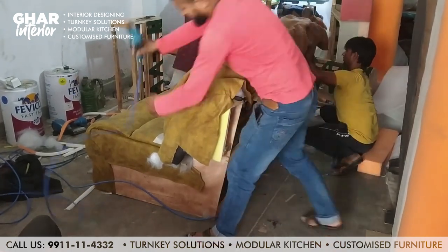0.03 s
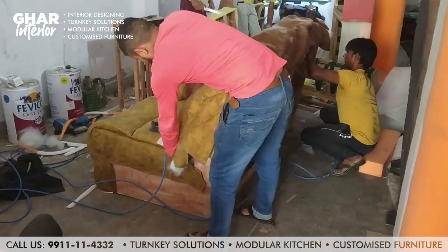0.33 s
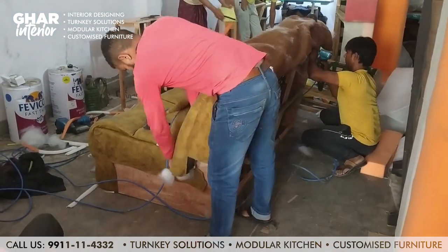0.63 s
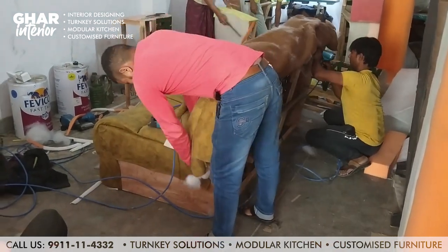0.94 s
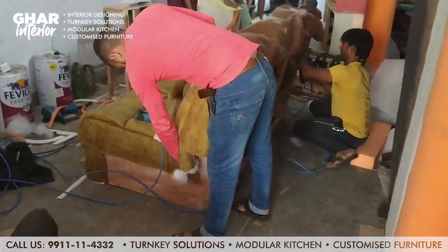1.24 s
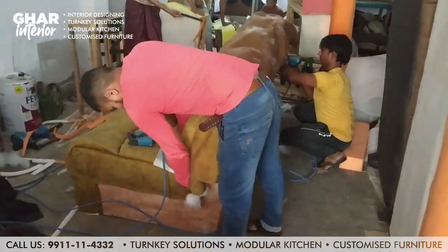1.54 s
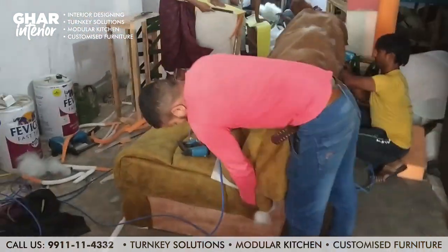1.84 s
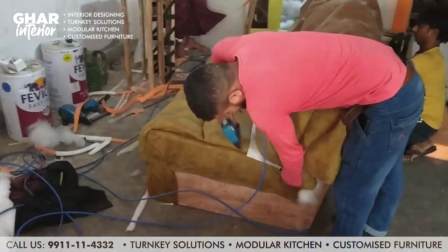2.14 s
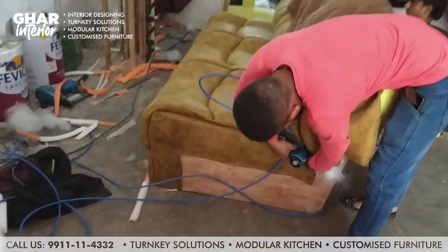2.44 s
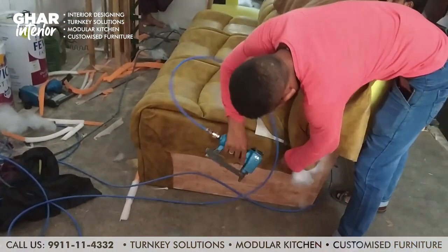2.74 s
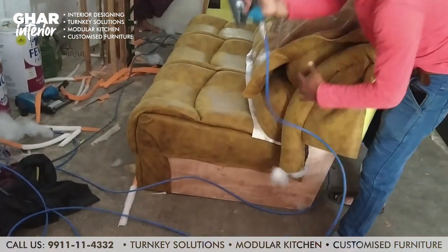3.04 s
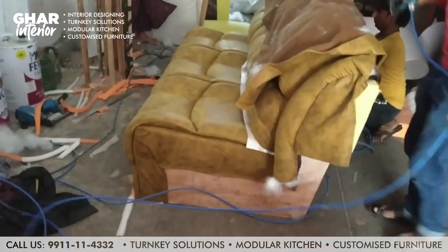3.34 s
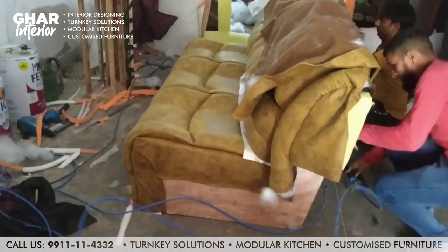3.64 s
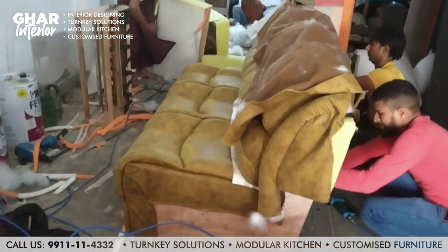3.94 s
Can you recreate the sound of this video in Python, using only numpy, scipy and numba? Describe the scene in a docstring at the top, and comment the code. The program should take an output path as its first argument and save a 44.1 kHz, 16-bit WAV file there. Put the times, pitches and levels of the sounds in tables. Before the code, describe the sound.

An air compressor runs with a rapid clatter and whistling hiss, heard from a moving microphone in an upholstery workshop. A pneumatic stapler cracks and puffs three times, twice, once loudly, then twice more, with a few faint squeaks.

```python
"""An air compressor drones in a small upholstery workshop: its pump thumps and clatters each turn,
and air hisses and whistles through its resonant passages. The tone shifts as the microphone moves.
A pneumatic stapler fires eight times, each a crack and, on release of the trigger, a very shrill puff
of exhaust; once the trigger clicks as it is released. A few faint squeaks come from the room, and one
light tick is heard. The microphone's limiter ducks the drone at the loud cracks and puffs."""
import sys
import numpy as np
from scipy import signal
from scipy.fft import rfft, irfft
from scipy.io import wavfile
from scipy.ndimage import uniform_filter1d
from numba import njit

SR = 44100
rng = np.random.default_rng(int(sys.argv[2]) if len(sys.argv) > 2 else 0)


def pcm_store(signal):
    """Save signal as 16-bit PCM."""
    levels = np.round(np.clip(np.atleast_2d(signal), -1, 1) * 32767)
    wavfile.write(sys.argv[1], SR, levels.astype(np.int16).T)


N = 176400

PUMP_HZ = 27.32  # turns per second
RIPPLE_DB, RIPPLE_HZ = 2.3, 90  # spectral ripple from reflections: depth, spacing

# the compressor at each place of the moving microphone
# (t/s, clatter gain/dB, air gain/dB, midrange tilt/(dB per octave), cover resonance/dB)
PLACES = [(0, -3.5, 0, -1.5, -7), (.7, -2, 0.4, -2, 2), (1.2, -4, -1, -1.9, -4), (1.7, 2.5, 0.5, -1.5, -2),
          (2.3, 2.5, 1, 0.1, 0), (3.0, 1.5, 1, 0.5, 4.5), (4, 3, 1.5, -0.5, 2.5)]
# balance of the two microphone ports (f/Hz, left minus right/dB)
PORT_BALANCE = [(60, 0), (200, -1.5), (700, 0), (1290, -2.5), (2380, -0.5), (4400, 3), (8120, 0),
                (15000, -3)]


def pump_clatter(t, turns):
    """Periodic excitation: clatter repeats each turn, its harmonics shaped by the path through the room."""
    # envelope of the harmonics (f/Hz, relative level/dB)
    clatter_tone = [(160, -106), (260, -76.5), (410, -74), (480, -74), (525, -50.5), (595, -63.5),
                    (630, -43.5), (680, -66), (711, -76), (740, -65), (790, -49), (830, -64.5),
                    (880, -48.5), (1010, -49.5), (1130, -74), (1340, -48.5), (1440, -56), (1540, -58.5),
                    (1670, -45), (1780, -49.5), (1880, -70), (3000, -78.5)]
    clatter_level_db, place_variation = -25.5, 0.214
    cover_hz, cover_width_hz = 960, 90
    common, out = turn_harmonics(), 0
    for k, (_, clatter_db, _, slope_db, cover_db) in enumerate(PLACES):
        lines = common + place_variation * turn_harmonics()
        hz = np.arange(lines.shape[1]) * PUMP_HZ
        pair = ports(*(lines / abs(lines)), hz)
        lean = undb(np.array([[1], [-1]]) * at_hz(PORT_BALANCE, hz) / 2)
        cover = cover_db * np.exp(-((hz - cover_hz) / cover_width_hz) ** 2)
        tone = undb(at_hz(clatter_tone, hz) + cover) * tilt(hz, slope_db) / (1 + (hz / 6000) ** 2)
        cycle = unit(irfft(pair / abs(pair) * lean * tone))
        phase = np.arange(cycle.shape[1]) / cycle.shape[1]
        repeated = np.array([np.interp(turns % 1, phase, side) for side in cycle])
        out = out + undb(clatter_db) * presence(t, k) * repeated
    return out * undb(clatter_level_db)


def turn_harmonics(size=2048, rattle_db=-18.5):
    """Fourier series of one turn: noisy knocks over a light rattle."""
    envelope = knocking(np.arange(size) / size) + undb(rattle_db)
    return rfft(envelope * rng.standard_normal((2, size)))


def knocking(turns, swell_s=0.00243):
    """Envelope of repeated impacts: each swells, then decays exponentially."""
    # knocks within one turn (phase/turn, relative level/dB)
    knocks = [(0.092, 2.5), (.31, -3), (.6, -8.5), (0.852, 0.5)]
    ages = [((turns - start) % 1) / PUMP_HZ / swell_s for start, _ in knocks]
    return sum(undb(db) * age * np.exp(1 - age) for age, (_, db) in zip(ages, knocks))


def piston(t, turns):
    """Impact excitation: two thumps a turn sound the pump's body; knocks keep the housing ringing."""
    # thumps as the microphone moves (t/s, phase of first/turn, body f/Hz, first level/dB, second level/dB)
    thumps = [(0, .25, 770, -18, -23), (1, .25, 765, -18, -23), (1.35, .235, 750, -14.5, -23),
              (1.75, .21, 730, -15.5, -24), (2.25, .14, 695, -19, -15), (2.8, .13, 685, -17.5, -15.5),
              (4, .13, 700, -17.5, -15.5)]
    # ring of the metal housing (t/s, level/dB)
    ring_levels = [(0, -25), (1.1, -24), (1.6, -22), (2.3, -26.5), (2.8, -20), (3.3, -19), (3.7, -30)]
    thump_s, gap_turns, left_lag_s = .0034, .252, .00013
    ring_harmonic = round(1700 / PUMP_HZ)
    turns = turns - np.array([[left_lag_s * PUMP_HZ], [0]])
    phase, body_hz, first_db, second_db = curve(t, thumps)
    out = undb(curve(t, ring_levels)[0]) * knocking(turns) * np.cos(2 * np.pi * ring_harmonic * turns)
    for centre, db in ((phase, first_db), (phase + gap_turns, second_db)):
        age = ((turns - centre + .5) % 1 - .5) / PUMP_HZ
        out = out + undb(db) * np.exp(-(age / thump_s) ** 2) * np.cos(2 * np.pi * body_hz * age)
    return out


def airflow(t, turns):
    """Flow noise: air rushes through resonant passages and spits from the valve once a turn."""
    # rushing air (f/Hz, relative level/dB)
    rush_tone = [(25, -108), (110, -101), (240, -85), (390, -69.5), (450, -62), (800, -54.5), (1000, -54),
                 (1120, -59), (1300, -54.5), (1750, -54.5), (2300, -60), (2950, -55.5), (3370, -50),
                 (3580, -53.5), (3800, -52), (4300, -60), (5130, -50), (5550, -58.5), (6050, -56),
                 (7300, -68.5), (9800, -61.5), (12300, -70), (13200, -65), (15700, -73)]
    # passage resonances (f/Hz, half width/Hz, throb with the knocks 0-1, rows of (t/s, level/dB))
    resonances = [(3377, 44, 0.64, [(0, -31.5), (1.5, -32.5), (2.3, -34), (2.85, -27.5), (3.3, -30),
                  (3.6, -37)]), (5130, 9.6, 0, [(0, -30), (1.2, -30), (1.5, -29), (2.4, -29.5),
                  (2.9, -30.5), (4, -25.5)]), (5160, 230, 0, [(0, -48), (1.1, -33), (1.5, -35),
                  (2.3, -25.5), (2.9, -51), (4, -41)]), (12020, 330, 0, [(0, -33), (.7, -30), (1.5, -36),
                  (2.4, -38), (2.9, -32.5), (4, -32)])]
    # valve spit (f/Hz, relative level/dB)
    spit_tone = [(5000, -50), (8000, -1), (9800, -2), (12500, -1), (15500, -8)]
    rush_db, spit_db, flicker_db = -18.5, -28, 1
    stroke_depth, stroke_peak_turn, spit_turn = 0.027, 0.098, .12
    rush = ringing = 0
    for k, (_, _, air_db, slope_db, _) in enumerate(PLACES):
        rush += undb(rush_db + air_db) * np.sqrt(presence(t, k)) * noise(rush_tone, RIPPLE_DB, slope_db)
    knocks = unit(knocking(turns))
    for hz, width_hz, throb, levels in resonances:
        ringing += undb(curve(t, levels)[0]) * (1 + throb * (knocks - 1)) * whistle(t, hz, width_hz)
    spit_age = (turns - spit_turn) % 1 / PUMP_HZ
    spit = undb(spit_db) * burst(spit_age, attack_s=.001, hold_s=0.0077, decay_s=.004) * noise(spit_tone)
    stroke = 1 + stroke_depth * np.cos(2 * np.pi * (turns - stroke_peak_turn))
    return (rush + ringing + spit) * stroke * undb(flicker_db * walk(14))


def brief_whistle(t, start_s=2.14, length_s=.3, level_db=-26):
    """Narrowband flow noise: one high whistle of air swells and fades."""
    progress = np.clip((t - start_s) / length_s, 0, 1)
    return undb(level_db) * 2 * np.sqrt(progress * (1 - progress)) * whistle(t, hz=6360, width_hz=27)


def whistle(t, hz, width_hz):
    """Resonance: air rings in one narrow band, uncorrelated between the ports."""
    phase = 2 * np.pi * hz * t
    pair = [walk(width_hz) * np.cos(phase) + walk(width_hz) * np.sin(phase) for _ in range(2)]
    return unit(np.array(pair))


def stapler(t):
    """Impact and jet transients: the driver cracks, air blasts out and the padded frame knocks."""
    # staples (t/s, crack level/dB, blast level/dB, blast hold/s, frame level/dB)
    shots = [(0.751, -13, -10, 0.041, -7.5), (0.921, -13.5, -8, 0.029, -11),
             (1.0916, -27, -10.5, 0.018, -11), (1.7672, -15, -11.5, 0.035, -4),
             (1.9305, -28, -12.5, 0.029, -5), (2.565, -1.5, -7, .06, -1), (3.3663, -13, -8, 0.018, -3),
             (3.529, -12, -13, 0.03, -7)]
    # spectra of the crack, the air jet and the wooden frame (f/Hz, relative level/dB)
    crack_tone = [(300, -32), (900, -28), (2000, 13), (4000, -11), (7000, 7.5), (11000, 8), (15000, -8),
                  (17000, -30)]
    jet_tone = [(200, -41), (1000, -75), (3000, 6.5), (7000, 5), (11000, 1.5), (15000, -2), (17500, 14.5),
                (20000, 12.5)]
    frame_tone = [(100, -50), (250, -74), (450, 3.5), (700, -29), (1200, 4), (1900, 1), (2600, 4.5),
                  (3500, 1.5), (7000, -6.5)]
    crack = blast = frame = 0
    for start, crack_db, blast_db, blast_s, frame_db in shots:
        crack += undb(crack_db) * burst(t - start, attack_s=0.0015, hold_s=0.008, decay_s=0.0096)
        blast += undb(blast_db) * burst(t - start, attack_s=0.0063, hold_s=blast_s, decay_s=0.014)
        frame += undb(frame_db) * burst(t - start, attack_s=0.0032, hold_s=0.0012, decay_s=0.018)
    out = crack * noise(crack_tone, RIPPLE_DB) + blast * noise(jet_tone, RIPPLE_DB)
    out += frame * noise(frame_tone)
    bass_cut = signal.butter(4, 287, "high", fs=SR, output="sos")
    return signal.sosfilt(bass_cut, out)


def exhaust(t):
    """Jet noise: the stapler vents when the trigger is let go."""
    # exhaust puffs (t/s, hold/s, level/dB)
    puffs = [(0.81, 0.035, -3.5), (0.978, 0.035, -2.5), (1.152, 0.04, -5.5), (1.849, 0.027, -2),
             (1.999, 0.03, -3.5), (2.631, 0.015, 4), (3.444, 0.025, -3.5), (3.594, 0.029, -1.5)]
    # their spectrum, strongest at the edge of hearing (f/Hz, relative level/dB)
    puff_tone = [(300, -65), (2000, 4), (7000, 0), (12000, 1), (15800, 2.5), (17500, 25.5), (20000, -16)]
    envelope = sum(undb(db) * burst(t - start, attack_s=0.0087, hold_s=hold, decay_s=0.017)
                   for start, hold, db in puffs)
    return envelope * noise(puff_tone)


def tick_and_trigger(t):
    """Damped impacts: one light tick, then a click as the stapler's trigger is released."""
    # the tick and the trigger's click (t/s, level/dB)
    clicks = [(2.255, -7), (2.635, 1)]
    # their spectrum (f/Hz, relative level/dB)
    click_tone = [(800, -57), (1800, -5), (2200, 5), (2500, -16), (3200, -4), (8000, -41)]
    envelope = sum(undb(db) * burst(t - start, attack_s=0.0024, hold_s=0.0022, decay_s=.004)
                   for start, db in clicks)
    return envelope * noise(click_tone)


def squeaks(t, blur_hz=100):
    """Spectral broadening: short gliding tones, blurred by the room, sound rough."""
    # squeaks (t/s, length/s, start f/Hz, middle f/Hz, end f/Hz, level/dB)
    glides = [(.22, .17, 1150, 1165, 1160, -33), (.66, .07, 1480, 1740, 1540, -16),
              (1.245, .07, 2180, 2050, 1880, -23), (1.51, .19, 1200, 1090, 1160, -23),
              (1.82, .035, 1440, 1470, 1450, -16)]
    blur = np.array([walk(blur_hz) + 1j * walk(blur_hz) for _ in range(2)])
    out = 0
    for start, length, *path_hz, db in glides:
        progress = np.clip((t - start) / length, 0, 1)
        phase = 2 * np.pi * np.cumsum(np.interp(progress, [0, .5, 1], path_hz)) / SR
        envelope = undb(db) * np.sqrt(4 * progress * (1 - progress))
        out += envelope * np.real((.5 + .5 * blur) * np.exp(1j * phase))
    return out


def ports(shared, diffuse, hz):
    """Partial coherence: left and right spectra at two microphone ports; the right one leads."""
    # likeness of the ports (f/Hz, coherence 0-1)
    likeness = [(60, .95), (300, .94), (700, .88), (1400, .72), (3200, .72), (5000, .45), (8000, .5),
                (15000, .48)]
    lag_s, knee_hz = .00019, 950  # the lag shrinks below the knee
    coherence = np.clip(at_hz(likeness, hz), 0, 1)
    lean = undb(at_hz(PORT_BALANCE, hz) / 2)
    delay = np.exp(-2j * np.pi * hz * lag_s * hz / (hz + knee_hz))
    left = (coherence * shared + np.sqrt(1 - coherence ** 2) * diffuse) * delay
    return np.array([left * lean, shared / lean])


def noise(tone, ripple_db=0, slope_db=0):
    """Spectrally shaped stereo noise, rms 1; interference of reflections may ripple it."""
    hz = np.fft.rfftfreq(N, 1 / SR)
    shared, diffuse = rng.standard_normal((2, len(hz))) + 1j * rng.standard_normal((2, len(hz)))
    grid = np.arange(0, SR / 2, RIPPLE_HZ)
    ripple = ripple_db * np.interp(hz, grid, rng.standard_normal(len(grid)) * np.minimum(grid / 2500, 1))
    gain = undb(at_hz(tone, hz) + ripple) * tilt(hz, slope_db)
    return unit(irfft(ports(shared, diffuse, hz) * gain, N))


def presence(t, k):
    """Linear crossfade: weight 0-1 of the microphone's k-th place."""
    return np.interp(t, [row[0] for row in PLACES], np.arange(len(PLACES)) == k)


def burst(age, attack_s, hold_s, decay_s):
    """Linear rise, with exponential decay from hold_s after the onset."""
    return np.clip(age / attack_s, 0, 1) * np.exp(-np.maximum(age - hold_s, 0) / decay_s)


def walk(rate_hz):
    """Low-pass random fluctuation, rms 1."""
    hz = np.fft.rfftfreq(N, 1 / SR)
    return unit(irfft(rfft(rng.standard_normal(N)) / (1 + (hz / rate_hz) ** 4), N))


def tilt(hz, db_per_octave):
    """Gain that slopes the midrange."""
    return undb(db_per_octave * np.log2(np.clip(hz, 300, 1700) / 850))


def at_hz(table, hz):
    """Interpolate a spectrum on a log-frequency axis."""
    f, value = np.array(table).T
    return np.interp(np.log(np.maximum(hz, 1)), np.log(f), value)


def curve(t, rows):
    """Interpolate each column of a table over time."""
    when, *columns = np.array(rows).T
    return [np.interp(t, when, column) for column in columns]


def undb(db):
    """Decibels to amplitude ratio."""
    return 10 ** (np.asarray(db) / 20)


def unit(x):
    """Scale to rms 1."""
    return x / np.sqrt(np.mean(x ** 2))


@njit
def follow(power, rise, fall):
    """Envelope follower: one-pole smoothing with separate rates up and down."""
    out, level = np.empty(len(power)), 0.
    for i in range(len(power)):
        level += (power[i] - level) * (rise if power[i] > level else fall)
        out[i] = level
    return out


def scene():
    """Superposition of compressor, stapler, squeaks and a light tick."""
    t = np.arange(N) / SR
    wander_s = .00004  # slack in the pump's timing
    turns = (t + wander_s * walk(2.3)) * PUMP_HZ
    compressor = pump_clatter(t, turns) + piston(t, turns) + airflow(t, turns) + brief_whistle(t)
    return compressor + stapler(t) + exhaust(t) + squeaks(t) + tick_and_trigger(t)


def record(dry):
    """Limiting: gain falls while the sound is loud; soft clipping and a low-pass filter follow."""
    limit_db, attack_s, release_s = -13.5, 0.0021, 0.0049
    ceiling, top_hz = .85, 15800
    power = uniform_filter1d(np.mean(dry ** 2, axis=0), size=128)
    rms = np.sqrt(follow(power, 1 / (attack_s * SR), 1 / (release_s * SR)))
    limited = dry / np.maximum(rms / undb(limit_db), 1)
    rounded = limited / (1 + (limited / ceiling) ** 8) ** (1 / 8)
    return signal.sosfilt(signal.ellip(12, .1, 90, top_hz, fs=SR, output="sos"), rounded)


dry = scene()
out = record(dry)
pcm_store(out)
```